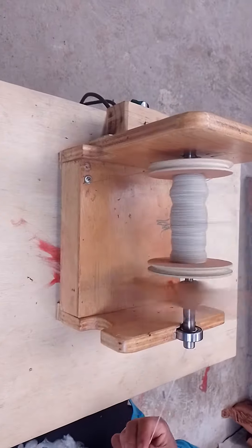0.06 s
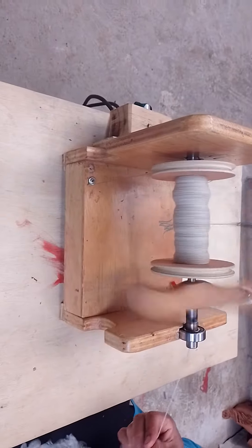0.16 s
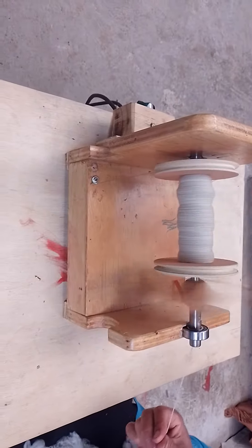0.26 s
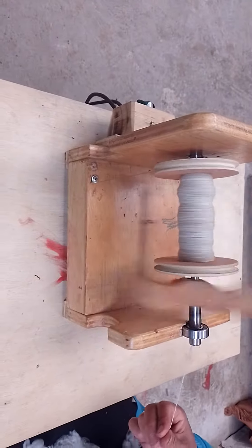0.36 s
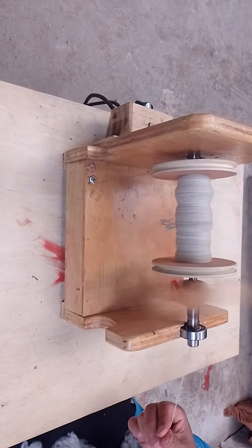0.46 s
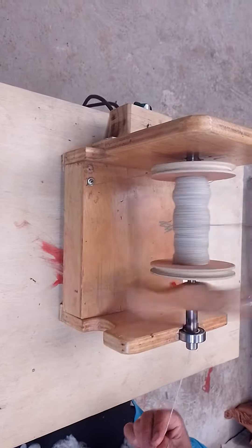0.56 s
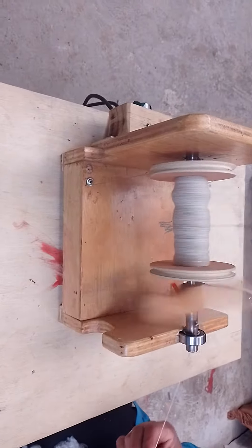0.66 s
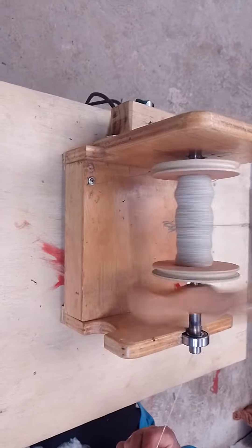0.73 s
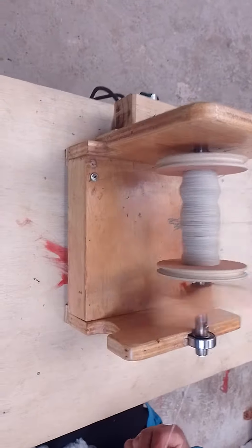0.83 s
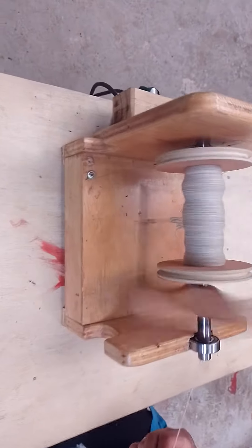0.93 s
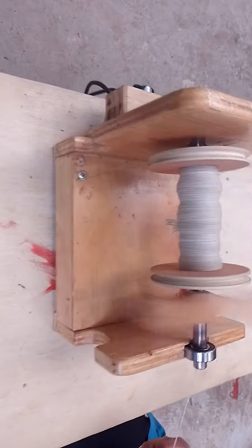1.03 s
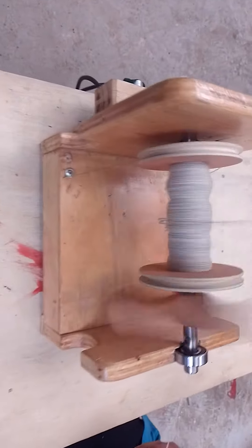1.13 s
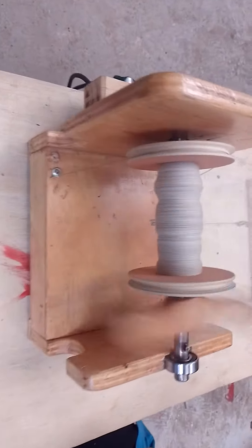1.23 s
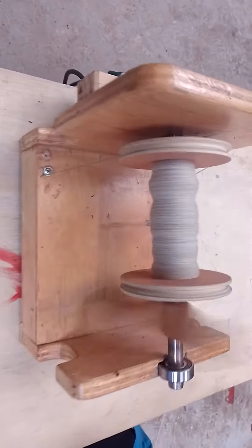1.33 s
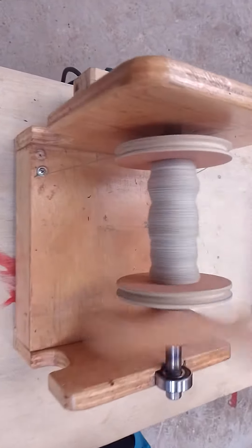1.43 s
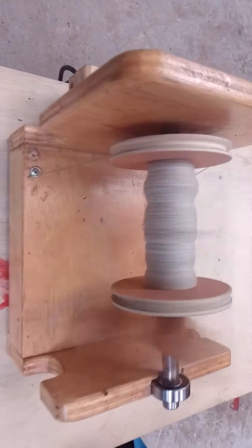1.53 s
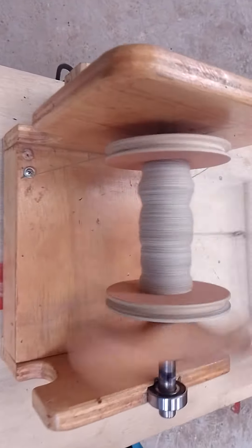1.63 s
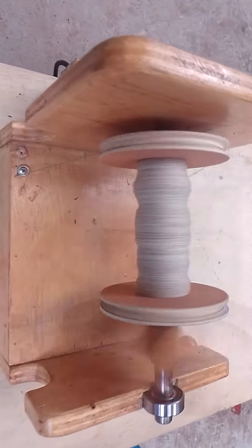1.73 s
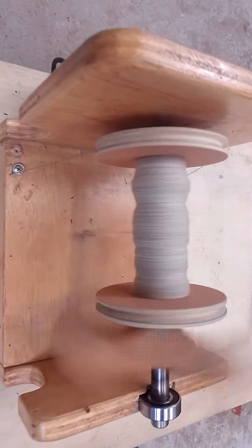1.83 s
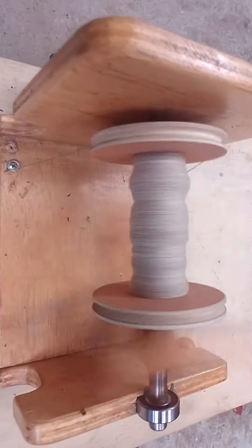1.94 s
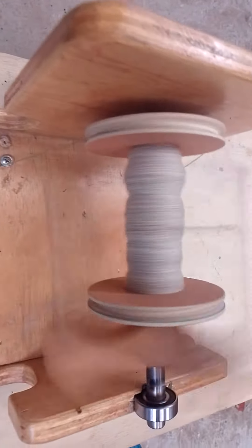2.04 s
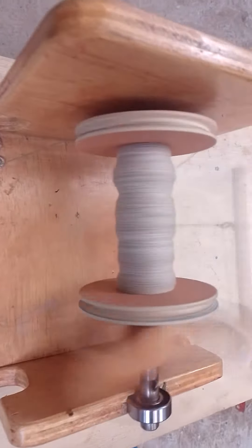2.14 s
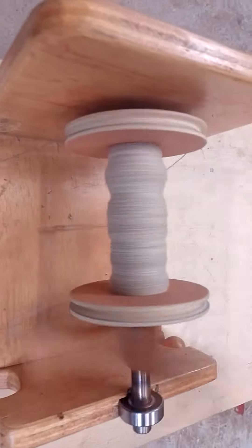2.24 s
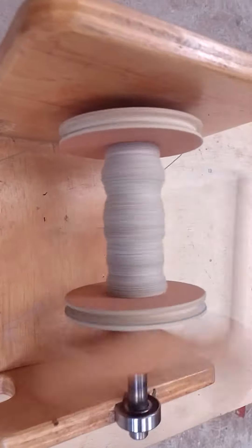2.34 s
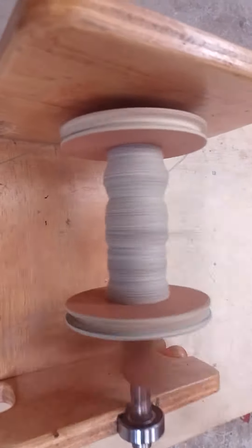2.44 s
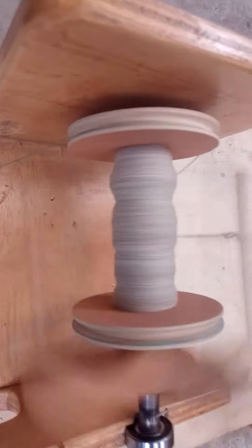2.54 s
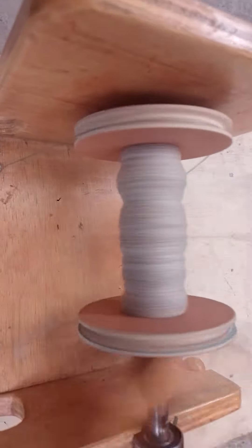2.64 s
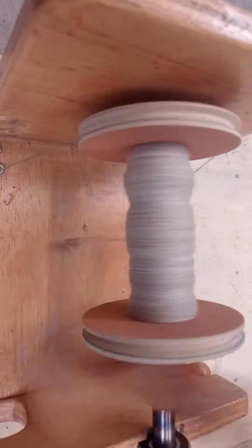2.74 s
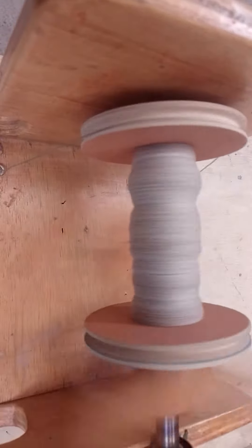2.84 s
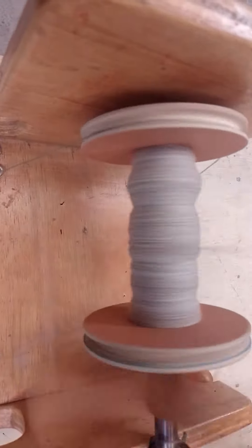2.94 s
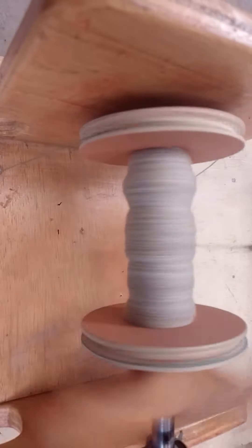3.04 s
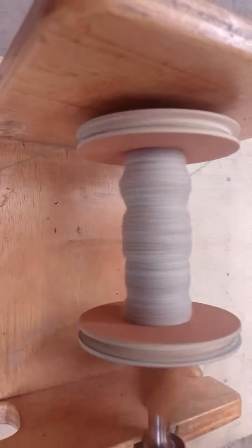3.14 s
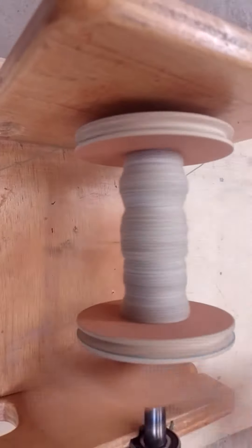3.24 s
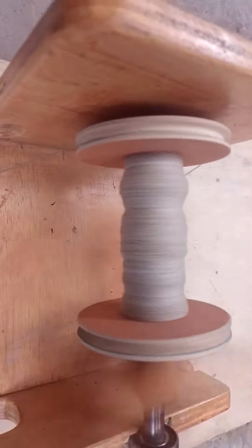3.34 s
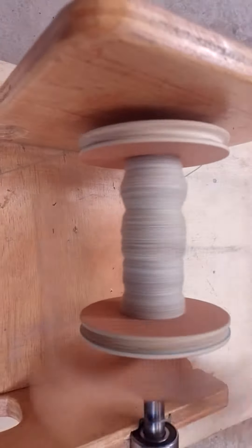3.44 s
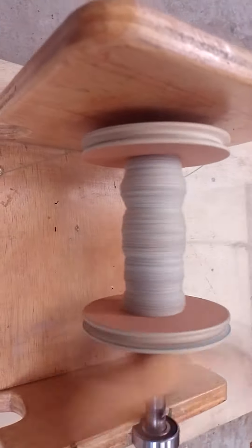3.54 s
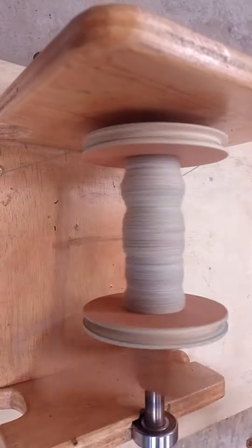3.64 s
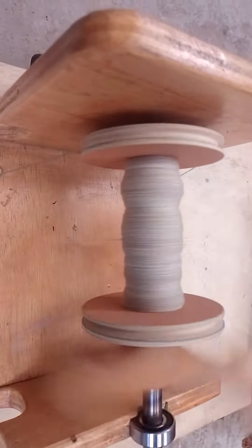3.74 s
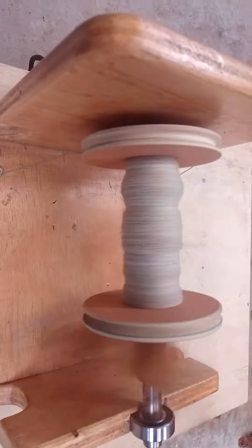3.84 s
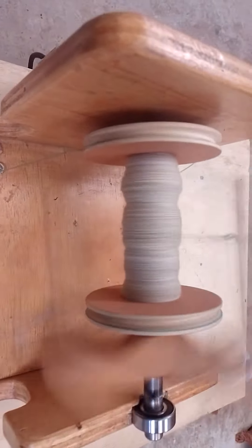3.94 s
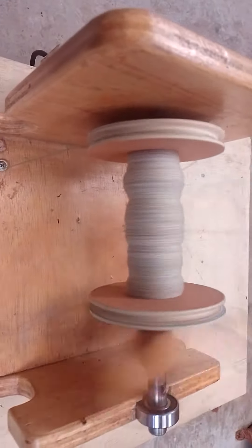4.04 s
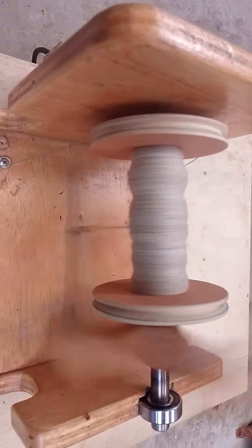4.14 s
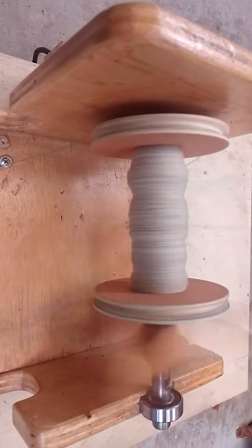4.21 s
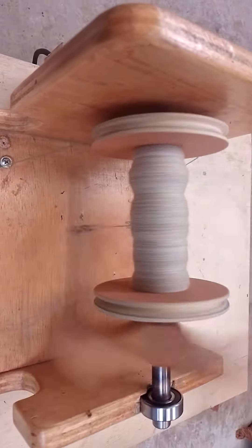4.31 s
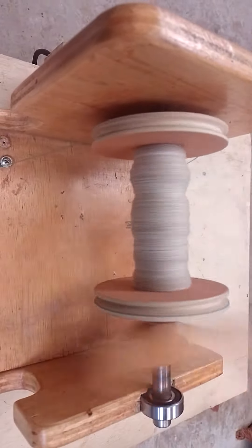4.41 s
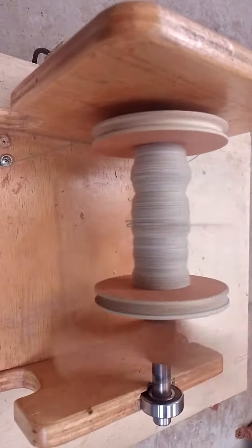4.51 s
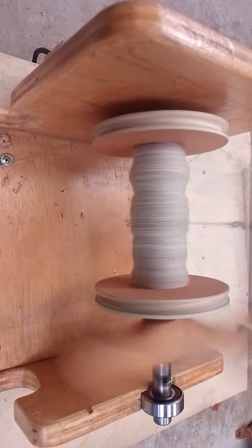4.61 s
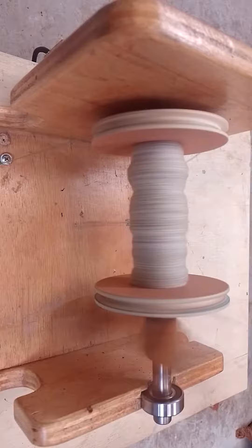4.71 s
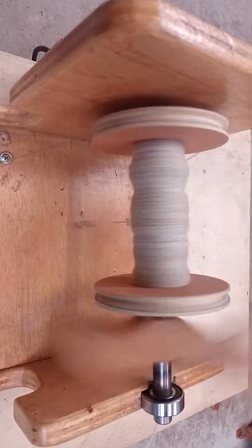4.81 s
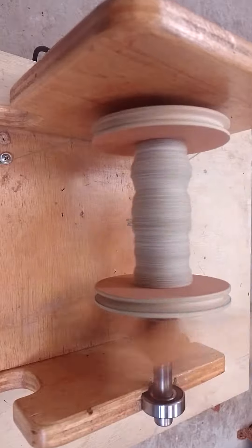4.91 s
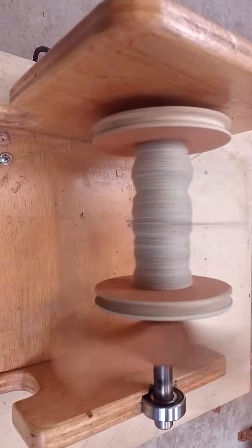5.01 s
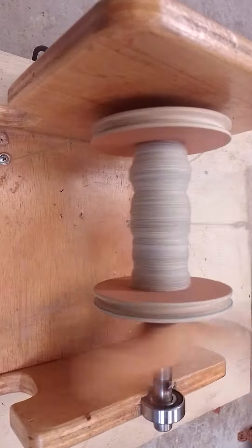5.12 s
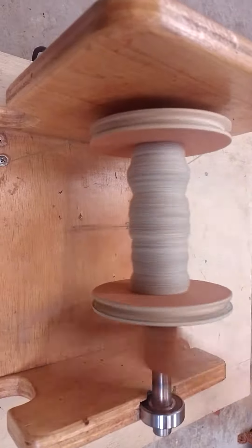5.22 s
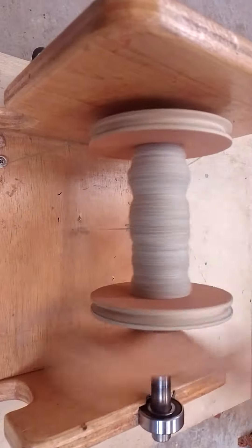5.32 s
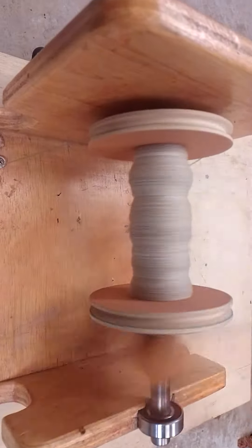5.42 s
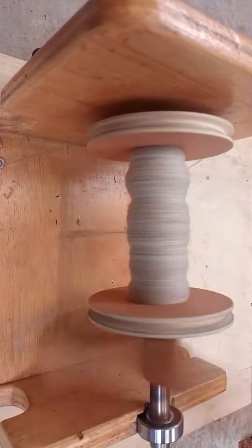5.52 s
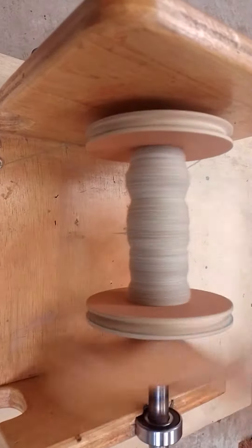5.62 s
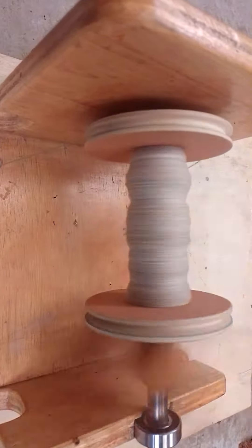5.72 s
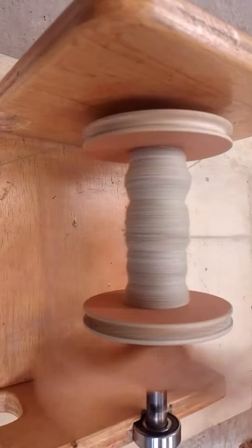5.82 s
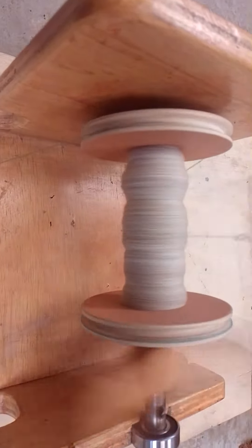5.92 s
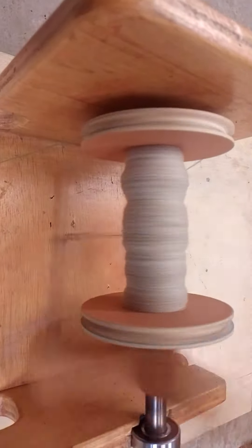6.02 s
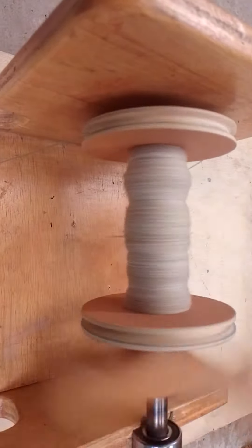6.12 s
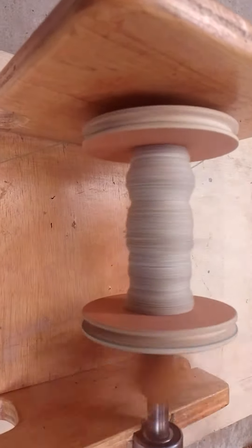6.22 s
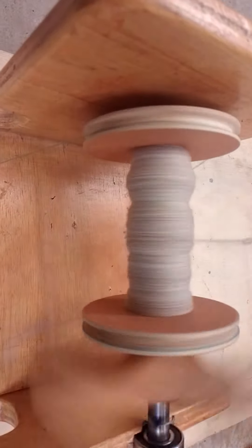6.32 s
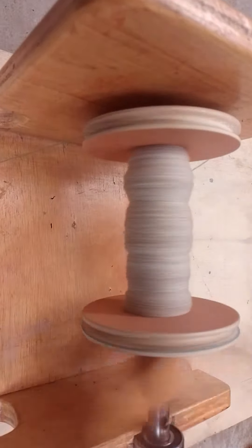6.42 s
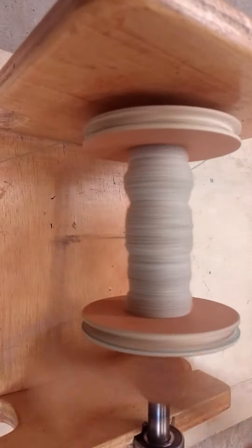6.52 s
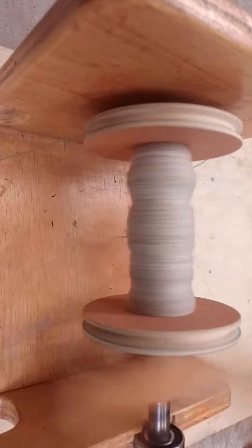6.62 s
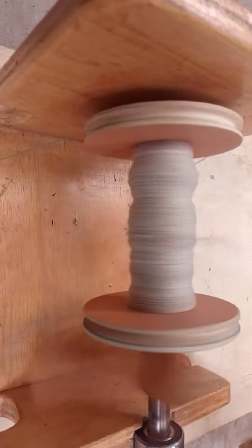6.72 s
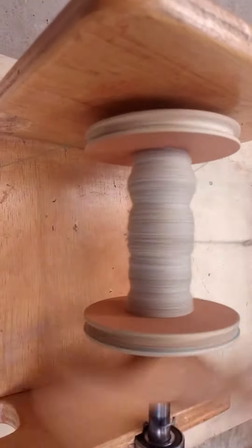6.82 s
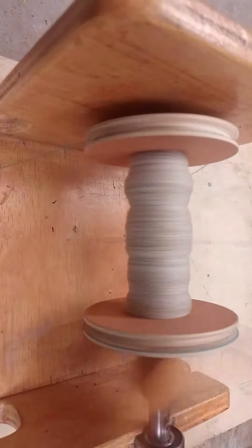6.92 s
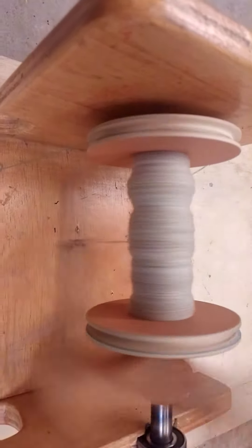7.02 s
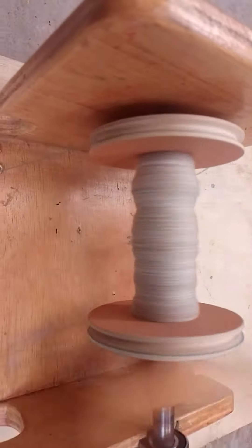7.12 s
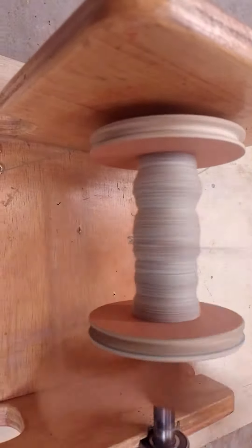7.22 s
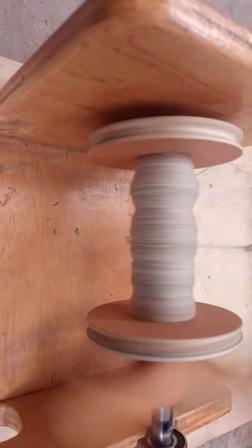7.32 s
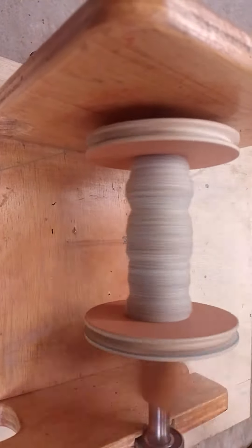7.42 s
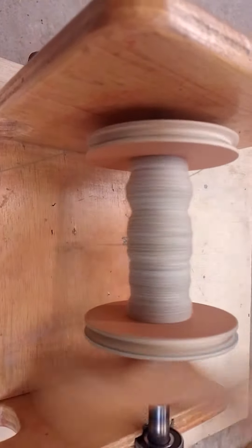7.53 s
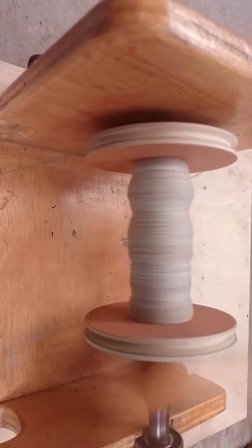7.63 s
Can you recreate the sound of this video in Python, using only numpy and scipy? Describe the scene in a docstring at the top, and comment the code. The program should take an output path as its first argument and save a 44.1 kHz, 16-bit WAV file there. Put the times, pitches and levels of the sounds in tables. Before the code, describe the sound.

Continuous mechanical whirr of a motor-driven wooden flyer and bobbin, about twelve turns a second, with fine metallic chatter. Over it a mid-high whine swells and bends in a pattern repeating between two and three times a second. Soft low rumble comes from the table. The handheld microphone starts distant, approaches during the first three seconds, then stays near, revealing crisp irregular clicks. Dry, with only very short reflections.

```python
"""A small electric spinning wheel on a table is already turning, heard from far: swaying sine tones for the belt's
whine, coloured noise and ringing knocks for the whirr of bearings and frame, low noise and hums for the table.
The whirr dips at half a second, then the microphone moves in: whine, bass and the tick of each flyer turn grow.
From 2.7 s strong ticks, triple contacts ringing in metal, stand out. From about 3 s the microphone stays close,
the whine repeating its pattern every lap of the belt, to the end."""
import sys
import numpy as np
from scipy import signal
from scipy.fft import rfft, irfft, next_fast_len
from scipy.io import wavfile
from scipy.ndimage import uniform_filter1d, map_coordinates

SR = 44100
rng = np.random.default_rng(int(sys.argv[2]) if len(sys.argv) > 2 else 0)


def dump(signal):
    """Clip the signal to [-1, 1] and save it as 16-bit WAV at the path in sys.argv[1]."""
    limited = np.clip(np.atleast_2d(signal).T, -1, 1)
    pcm = np.round(limited * 32767).astype(np.int16)
    wavfile.write(sys.argv[1], SR, pcm)


def gain_from_decibels(decibels):
    """Convert decibel values to linear amplitude factors."""
    exponent = np.asarray(decibels, float) / 20
    return 10 ** exponent


N = 337806

LAP_HZ, MAIN_HZ = 2.56, 1351   # belt laps; main tone of the whine before the belt bends it


def rms_one(x):
    """Scale to unit rms."""
    return x / np.sqrt(np.mean(x ** 2) + 1e-20)


def read(rows, at):
    """Join the rows of a table by straight lines."""
    key, *columns = np.transpose(rows)
    return [np.interp(at, key, c) for c in columns]


def drift(rate_hz):
    """Random wander of unit rms: noise through a double low-pass, made at a twentieth of the sample rate."""
    pole = np.exp(-2 * np.pi * rate_hz * 20 / SR)
    noise = rng.standard_normal(N // 20 + 4002)
    slow = signal.lfilter([1], [1, -2 * pole, pole * pole], noise)[4000:]   # skip the filter's run-in
    return np.interp(np.arange(N) / 20, np.arange(len(slow)), rms_one(slow))


def butter(x, order, hz, kind="low"):
    """Butterworth filter."""
    return signal.sosfilt(signal.butter(order, hz, kind, fs=SR, output="sos"), x)


def colour(x, spectrum):
    """Filter by a spectrum, unit gain for white noise."""
    size = next_fast_len(N)
    hz, db = np.transpose(spectrum)
    gain = gain_from_decibels(np.interp(np.log(np.fft.rfftfreq(size, 1 / SR) + 1), np.log(hz), db))
    return irfft(rfft(x, size) * rms_one(gain), size)[:N]


def ring(clicks, hz, t60_s):
    """Two-pole resonator: a unit click sets a decaying sine of height 1 ringing."""
    r, w = gain_from_decibels(-60 / (t60_s * SR)), 2 * np.pi * hz / SR
    return signal.lfilter([0, np.sin(w)], [1, -2 * r * np.cos(w), r * r], clicks + 1e-18)


def sine(hz):
    """Sine that follows a moving pitch."""
    return np.sin(2 * np.pi * np.cumsum(hz) / SR)


# whine strength at the microphone: time_s, low_tone_db, main_tone_db, high_tone_db
WHINE_LEVELS = [(0.0, -47, -31.5, -37), (0.5, -40.5, -29.5, -39), (2.07, -35.5, -26.5, -29.5),
                (3.0, -33.5, -23, -36.5), (4.22, -34.5, -26, -36.5), (7.66, -34, -24, -35.5)]
# tones below and above the main one: pitch_hz
SIDE_PITCHES = [919.4, 1908]


def whine(t):
    """Three near-sine tones and a faint shadow, swelling and bending with belt lap and bobbin turn."""
    main_db, main_hz, taut = belt(t)
    # the low tone follows the swells loosely and rises as the belt pulls taut
    low_db = uniform_filter1d(np.interp(t + 0.012, t, main_db), size=int(0.018 * SR))
    low_db = 4.5 * taut + 0.8 * low_db
    # the high tone sounds in the gaps, most of all where the lap is slack; no chirp grows past 15 dB
    high_db = -1.6 * np.interp(t + 0.011, t, main_db) + 3 * np.cos(2 * np.pi * t * LAP_HZ)
    high_db = np.minimum(high_db, 15)
    bend = main_hz / MAIN_HZ - 1
    pitches = SIDE_PITCHES[0] * (1 + 1.2 * bend), main_hz, SIDE_PITCHES[1] * (1 + 0.5 * bend)
    levels_db = read(WHINE_LEVELS, t)
    # a faint rough tone shadows the main one from below
    shadow = sine(0.893 * main_hz + 30 * drift(59.3))
    out = gain_from_decibels(levels_db[1] - 12) * rms_one(gain_from_decibels(0.5 * main_db) * shadow)
    for hz, level_db, sway_db in zip(pitches, levels_db, (low_db, main_db, high_db)):
        # pitch is high while a swell grows and low while it fades
        growth_db_per_s = uniform_filter1d(np.gradient(sway_db) * SR, size=700)
        hz = hz * (1 + 0.000005 * growth_db_per_s) + 13.02 * drift(35.1)
        strength = gain_from_decibels(sway_db + 2 * drift(32))
        out = out + gain_from_decibels(level_db) * rms_one(strength * sine(hz))
    return out


# the belt grips six times a lap, each grip a swell of the main tone: lap_share, length_laps, swell_db
BELT_GRIPS = [(.125, .032, -2.5), (.285, 0.067, -0.5), (.475, 0.076, -0.5), (.635, .07, -1),
              (.82, .052, -0.5), (.975, .045, -2.5)]


def belt(t):
    """Strength dB, pitch Hz and tension 0-1 of the main tone as the grips come round, swayed by the bobbin."""
    share, length, db = np.transpose(BELT_GRIPS)[:, :, None]
    away = ((t * LAP_HZ - share + 0.5) % 1 - 0.5) / length
    # once a lap the belt pulls taut slowly and lets go fast
    past = (t * LAP_HZ - 0.59 + 0.5) % 1 - 0.5
    taut = np.exp(-(past / np.where(past < 0, 0.13, 0.06)) ** 2)
    grips = np.sum(gain_from_decibels(db) * np.exp(-abs(away) ** 2.76), axis=0)
    swell_db = 20 * np.log10(gain_from_decibels(-16.5) + grips)   # a weak tone remains between grips
    # pitch drops through each grip
    near = np.exp(-away ** 2 / 2) + 1e-9
    through = np.sum(near * np.clip(away, -1.5, 1.5), axis=0) / np.sum(near, axis=0)
    pitch_hz = MAIN_HZ + 51.93 * taut - 20.4 * through
    bobbin = 2 * np.pi * (12.55 * t - 0.75)   # 12.55 turns per second
    pitch_hz = pitch_hz * (1 + 0.0088 * np.cos(bobbin + 0.66))
    return swell_db + 1.05 * np.cos(bobbin), pitch_hz, taut


# flyer rotation: time_s, turns_done
FLYER_TURNS = [(0.01, 0), (3.0574, 37), (7.6186, 92), (7.7015, 93)]
# knocking places on a turn: turn_share, swell_db, length_turns, tick_db
KNOCK_PLACES = [(0.002, 1, 0.088, 8), (0.44, -0.5, 0.084, 9), (0.11, 1.5, 0.063, 6)]


def rattle(t):
    """Bearing noise swelling where the flyer knocks, and small metal parts ringing from knocks and chatter."""
    turns, = read(FLYER_TURNS, t)
    swell_db, count = 0.089 * belt(t)[0], int(turns[-1])
    at, strike_db = [], []
    for share, db, length, tick_db in KNOCK_PLACES:
        bump = np.exp(-(((turns - share + 0.29) % 1 - 0.3) / length) ** 2)
        swell_db = swell_db + db * (1 + 0.19 * drift(1.6)) * bump
        knock_turns = np.arange(count) + share + rng.normal(0, 0.02, count)
        at.append(np.interp(knock_turns, turns, np.arange(N)).astype(int))
        strike_db.append(tick_db + rng.normal(0, 2, count))
    # the motor adds a light uneven tap on each of its turns
    motor_hz = 66.4
    beats = np.arange(1, int(N / SR * motor_hz) - 1)
    at.append(((beats + rng.normal(0, 0.15, len(beats))) / motor_hz * SR).astype(int))
    strike_db.append(4 + swell_db[at[-1]] + rng.normal(0, 3.45, len(beats)))
    at, strike_db = np.concatenate(at), np.concatenate(strike_db)
    # the knocking shows far more in the treble than in the body tone
    white = rng.standard_normal(N)
    dull = butter(white, 2, 2600)
    body = gain_from_decibels(0.17 * swell_db + 1.3 * drift(32)) * dull
    hiss = body + gain_from_decibels(swell_db + 1.42 * drift(45)) * (white - dull)
    chatter = np.zeros(N)
    for hz in np.linspace(2400, 15000, num=36) + rng.normal(0, 84, 36):
        touches = rng.integers(0, N, int(45 * N / SR))   # 45 per second on each part
        luck = np.minimum(rng.exponential(1, len(touches)), 4)
        clicks = np.zeros(N)
        clicks[touches] = gain_from_decibels(swell_db[touches] + 4.92 * luck)
        # a knock reaches the parts a little apart in time and favours the smallest
        reach = np.clip(at + rng.integers(0, 70, len(at)), 0, N - 1)
        clicks[reach] += gain_from_decibels(strike_db + 2.8 * np.log2(hz / 7000) + rng.normal(0, 3.2, len(at)))
        chatter += ring(clicks * rng.choice([-1, 1]), hz, 0.015)
    return rms_one(rms_one(hiss) + 0.88 * rms_one(chatter))


# loudness at the microphone: time_s, whirr_db, rumble_db
LOUDNESS = [(0.0, -21, -40), (0.5, -23, -41), (1.6, -19, -36.5), (3.0, -20.5, -36), (4.48, -21, -37),
            (7.66, -20, -36)]
# where the microphone is: time_s, position (0 far, 1 midway, 2 close), treble_lift_db
MIC_POSITION = [(0, 0.16, -9), (.8, 0.19, 0), (1.3, 1.03, 3), (2.1, 1.11, -11), (2.7, 1.72, 3.5),
                (3.2, 2.05, 2), (3.6, 1.86, 2.5), (4.6, 1.89, -0.5), (5.6, 1.99, 3), (7.66, 1.97, 1.5)]
# colour of the whirr from each position: pitch_hz, density_db_per_hz
FAR_COLOUR = [(860, -2.5), (2400, -9), (2850, -18.5), (3700, -21), (4250, -45), (4850, -17.5), (5600, -13),
              (6200, -20), (6600, -55), (7700, -33), (8400, -24.5), (9400, -17.5), (11300, -44),
              (16000, -64)]
MIDWAY_COLOUR = [(860, -11.5), (1900, -7.5), (2550, -9), (2900, -21.5), (3800, -27), (4400, -55),
                 (4900, -25.5), (6200, -20), (7000, -50.5), (7900, -38), (8900, -21.5), (10300, -38),
                 (12300, -59), (16000, -60)]
CLOSE_COLOUR = [(860, -8.5), (1950, -8), (2300, -28.5), (2600, -9.5), (2900, -18.5), (3700, -13.5),
                (4350, -25), (4800, -20), (5400, -25.5), (6250, -19), (8100, -23), (9200, -16),
                (10800, -25.5), (12600, -43.5), (15500, -65)]


def whirr(t):
    """The rattle through the colour of the microphone's position, crossfading between three spectra."""
    position, lift_db = read(MIC_POSITION, t)
    source = butter(rattle(t), 14, 880, "high")
    heard = np.zeros(N)
    for place, spectrum in enumerate((FAR_COLOUR, MIDWAY_COLOUR, CLOSE_COLOUR)):
        share = np.clip(1 - abs(np.clip(position, 0, 2) - place), 0, 1)
        heard += share * colour(source, spectrum)
    treble = butter(heard, 2, 8500, "high")
    return gain_from_decibels(read(LOUDNESS, t)[0]) * (heard + (gain_from_decibels(lift_db) - 1) * treble)


# the strongest ticks: time_s, strength_db, brightness (0-1)
STRONG_TICKS = [(2.7262, -24, 0.4), (2.9736, -21, 0.4), (3.0574, -21, 0.25), (3.146, -20.5, 0.7),
                (3.269, -20.5, 1), (3.31, -24, 0.5), (3.7219, -25.5, 1), (4.2592, -19, 0.64),
                (5.2964, -21, 0.6), (5.8296, -21, 0.9), (5.9614, -21.5, 0.04), (6.0776, -19.5, 0.2),
                (6.4083, -22.5, 0.79), (6.8678, -22, 0.5), (7.0366, -17, 0.13), (7.1148, -21, 0.45),
                (7.198, -20.5, 0.56)]
# what a tick rings with, dull to bright: pitch_hz, level_db, t60_s
METAL_MODES = [(3080, -7, 0.0041), (3560, 3, 0.011), (4900, -9, 0.0046), (6030, 0, 0.0049),
               (7210, -3, 0.0076), (9280, 3.5, 0.0028), (10820, -2.5, 0.0077)]


def ticks(t):
    """Each tick is a quick triple contact ringing metal modes; brightness shifts its strength up the modes."""
    s, peak_db, bright = np.vstack([STRONG_TICKS, turn_ticks(t)]).T
    luck = rng.normal(0, 1, (len(s), 2 * len(METAL_MODES)))
    out = np.zeros(N)
    for k, (hz, db, t60_s) in enumerate(METAL_MODES):
        tilt_db = 12.7 * bright * np.log2(hz / 6000)
        size = gain_from_decibels(peak_db + db + tilt_db + 2 * luck[:, k])
        jitter = luck[:, -k - 1]
        clicks = np.zeros(N + SR)
        clicks[(s * SR).astype(int)] = size
        clicks[((s + 0.0013 + 0.0003 * jitter) * SR).astype(int)] -= 1.52 * size
        clicks[((s + 0.0024 - 0.0004 * jitter) * SR).astype(int)] += 0.51 * size
        out += ring(clicks[:N], hz, t60_s)
    return butter(out, 4, [2000, 13000], "band")


def turn_ticks(t):
    """One row (time_s, strength_db, brightness) for each flyer turn, louder as the microphone nears."""
    turns, = read(FLYER_TURNS, t)
    luck = rng.normal(0, 1, (int(turns[-1]) + 1, 3))
    s = abs(np.interp(np.arange(len(luck)) - 0.01, turns, t) + 0.00056 * luck[:, 0])
    far_db, close_db, spread_db = -47.5, -27, 3
    db = np.interp(read(MIC_POSITION, s)[0], [0, 2], [far_db, close_db]) + spread_db * luck[:, 1]
    return np.transpose([s, db, np.clip(0.11 + 0.16 * luck[:, 2], 0, 1)])


# colour of the table noise: pitch_hz, density_db_per_hz
TABLE_COLOUR = [(25, -40), (60, -34), (140, -21), (168, -41), (230, -14), (400, -2), (700, -4), (840, -9.5),
                (930, -29)]
# hum of table and frame, before the band-pass: pitch_hz, width_hz, level_db
TABLE_HUMS = [(194.5, 6.9, -19.5), (249.6, 13.5, -13), (310.3, 14.4, -10.5), (374, 26, -11)]


def rumble(t):
    """The table shakes: low noise pulsing with the flyer, and narrow hums of noise-driven resonators."""
    turns, = read(FLYER_TURNS, t)
    pulse_db = 0.74 * np.cos(2 * np.pi * turns) + 0.83 * np.cos(4 * np.pi * turns) + 2.06 * drift(16)
    hums = np.zeros(N)
    for hz, width_hz, db in TABLE_HUMS:
        t60_s = np.log(1000) / (np.pi * width_hz)
        hums += gain_from_decibels(db) * rms_one(ring(rng.standard_normal(N), hz, t60_s))
    hums = butter(hums, 4, [175, 420], "band")
    shake = rms_one(colour(gain_from_decibels(pulse_db) * rng.standard_normal(N), TABLE_COLOUR) + hums)
    # the deep bass grows with nearness
    bass = signal.sosfiltfilt(signal.butter(3, 130, fs=SR, output="sos"), shake)
    bass_db = np.interp(read(MIC_POSITION, t)[0], [1, 2], [-5, 1.5])
    return gain_from_decibels(read(LOUDNESS, t)[1]) * (shake + (gain_from_decibels(bass_db) - 1) * bass)


# echoes off frame and table: far_delay_s, close_delay_s, level_db (against the direct sound)
REFLECTIONS = [(.0021, 0.001286, -16), (.0037, .0027, -19.5), (.0062, .0048, -15)]


def echoes(x, t):
    """Short reflections whose delays shrink as the microphone nears and tremble with the hand; rms is kept."""
    position = read(MIC_POSITION, t)[0]
    out = x.copy()
    for far_s, close_s, db in REFLECTIONS:
        lag_s = far_s + (close_s - far_s) * position / 2 + 0.00002 * drift(0.54)
        out += gain_from_decibels(db) * map_coordinates(x, [np.arange(N) - lag_s * SR], order=3)
    return out * np.sqrt(np.mean(x ** 2) / np.mean(out ** 2))


def scene():
    """All parts of the wheel at one microphone; only the whirr has echoes."""
    t = np.arange(N) / SR
    return (echoes(whirr(t), t) + ticks(t) + rumble(t) + whine(t))[None]


def roll_off(x):
    """The treble ends steeply here."""
    return signal.sosfilt(signal.butter(12, 16350, fs=SR, output="sos"), x)


def record(dry):
    """A steep low-pass cuts the top from 16.2 kHz up."""
    mix = signal.sosfilt(signal.cheby2(14, 70, 16200, fs=SR, output="sos"), dry)
    return roll_off(mix)


dry = scene()
out = record(dry)
dump(out)
```